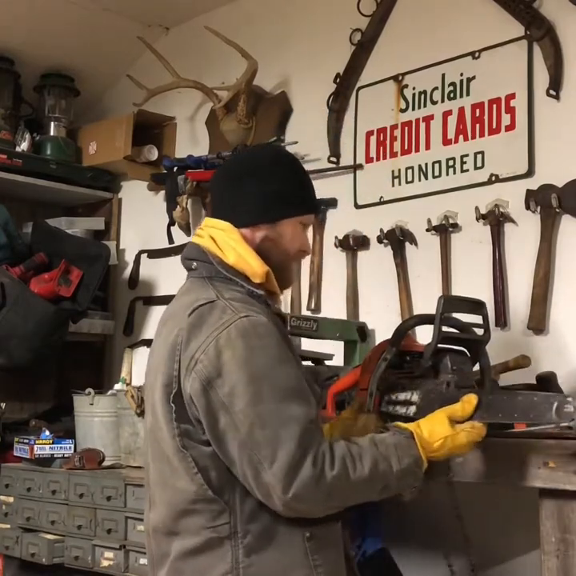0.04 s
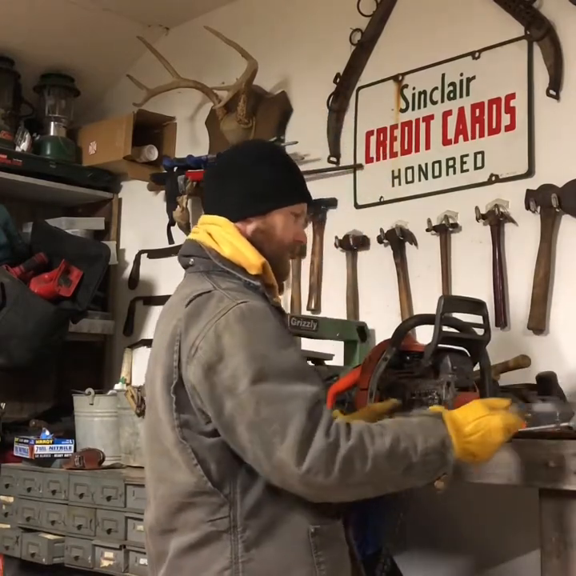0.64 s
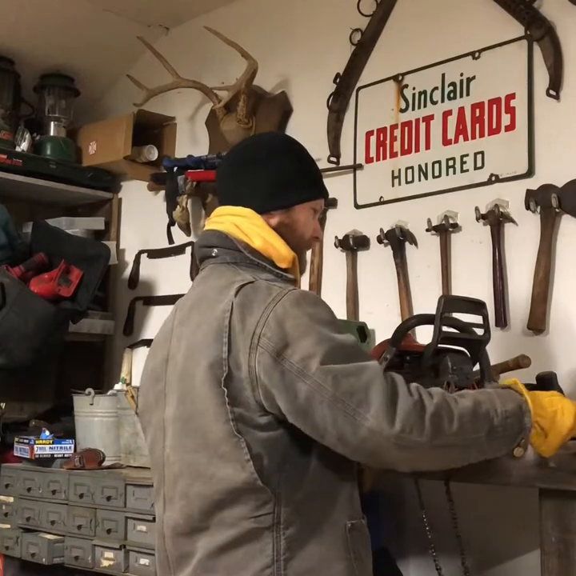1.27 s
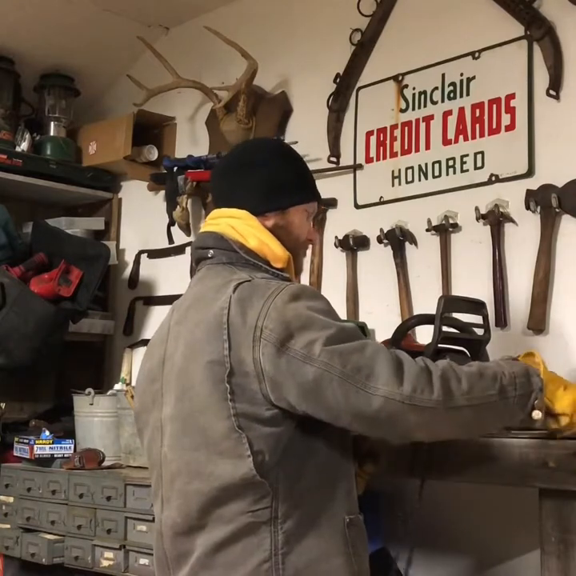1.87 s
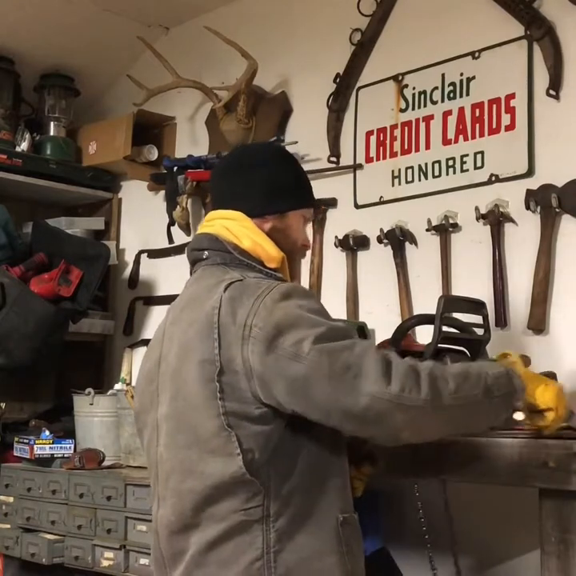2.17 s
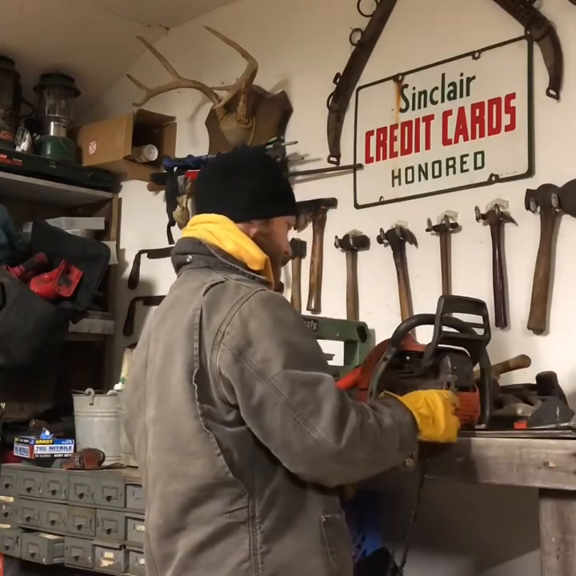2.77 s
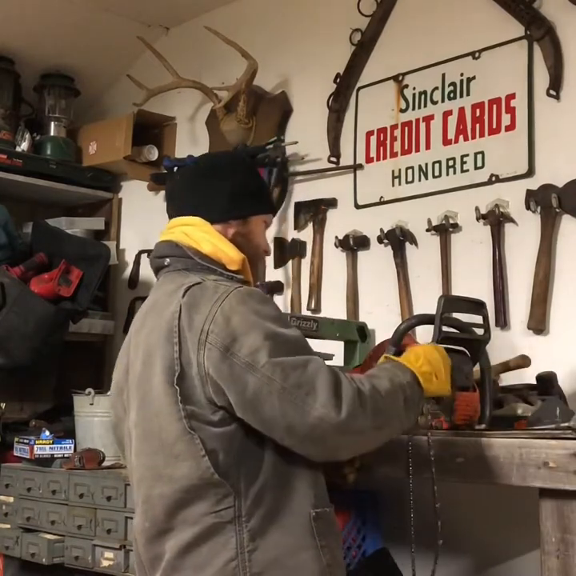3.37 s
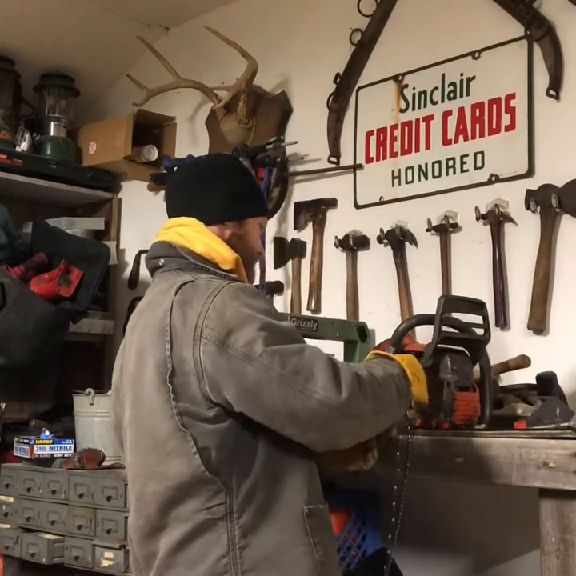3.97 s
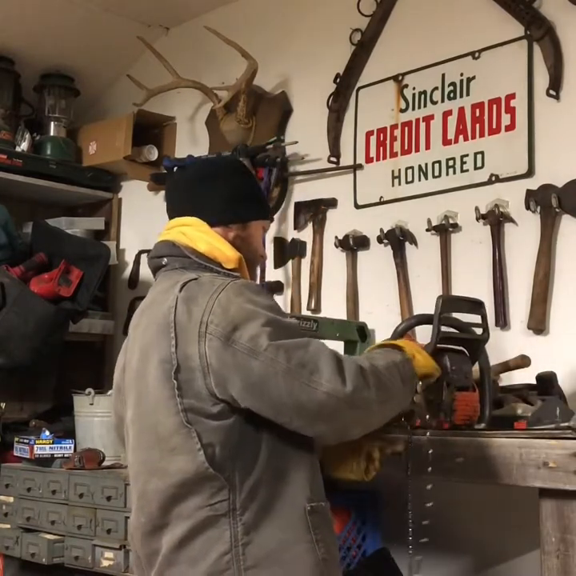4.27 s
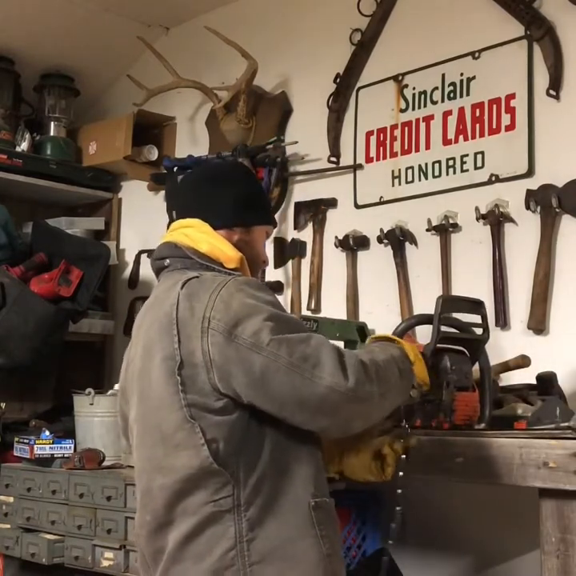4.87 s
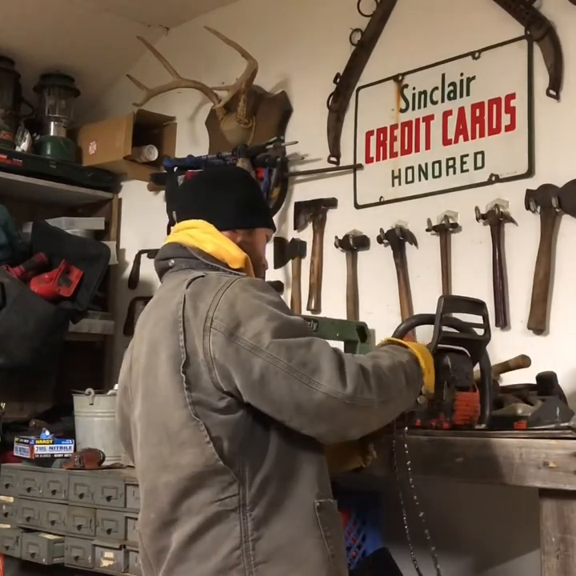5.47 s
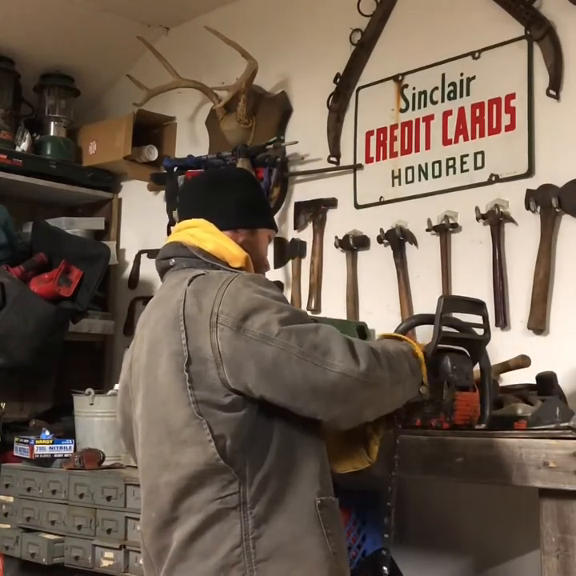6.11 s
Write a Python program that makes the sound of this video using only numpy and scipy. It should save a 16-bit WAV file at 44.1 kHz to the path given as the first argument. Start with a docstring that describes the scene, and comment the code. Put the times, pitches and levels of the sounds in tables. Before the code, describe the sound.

Woody bumps and a metal clatter on a bench, followed by light clinks and ticks of a saw chain being worked loose.

```python
"""A loose chainsaw chain is worked off its drive on a wooden bench in a small workshop.
First the steel guide bar slides off and is laid down with a few woody bumps and a clatter. Then the chain
drags and clacks over the plastic housing, its links tick and clink, and the steel clutch drum sings when
touched. Hits are a short crack plus ringing modes; drags are swarms of tiny slips. Underneath sit
a rubbing jacket sleeve, a short room tail and faint room tone."""
import sys
import numpy as np
from scipy import signal
from scipy.fft import rfft, irfft, next_fast_len
from scipy.io import wavfile

SR = 44100
rng = np.random.default_rng(int(sys.argv[2]) if len(sys.argv) > 2 else 0)


def digitize_waveform(pressure):
    """Quantize a signal to 16-bit integers and store it at the path in sys.argv[1].

    Rows of a 2-D input are taken as channels; values are limited to [-1, 1].
    """
    field = np.atleast_2d(pressure).T
    bounded = np.clip(field, -1, 1)
    quanta = np.round(bounded * 32767).astype(np.int16)
    wavfile.write(sys.argv[1], SR, quanta)


N = 270754

# Noise colours of the still room, the cloth and the sliding grit: pitch_hz, density_db
ROOM_TONE_EQ = [(15, -40.5), (25, 2), (145, 1), (242, -13), (317, -6), (516, -42), (677, -13.5),
                (1370, -44.5), (1740, -22.5), (16000, -33)]
CLOTH_EQ = [(40, -41), (100, -1), (190, 2), (450, -9), (900, -11.5), (2500, -23), (7000, -27.5),
            (16000, -43.5)]
GRIT_EQ = [(80, -15.5), (300, 9.5), (700, 4.5), (1400, -1.5), (2500, -4), (4000, -8), (7000, -10.5),
           (12000, -13.5), (16000, -22)]
# Length of the room tail: pitch_hz, t60_s
ROOM_DECAY = [(100, 0.45), (300, 0.48), (1500, 0.53), (5000, 0.44), (9000, .34), (16000, 0.24)]
# The crack of each body, its dense and quickly damped resonances: pitch_hz, density_db
BENCH_EQ = [(40, -26.5), (80, 2), (200, -5.5), (450, -2), (800, -6), (1400, -7), (2500, -12), (5000, -9.5),
            (16000, -19.5)]
BAR_EQ = [(100, 22.5), (500, 9), (1500, 2), (3300, -3.5), (4000, -2.5), (4850, -4.5), (6000, -7),
          (8500, -5.5), (12000, -9.5), (16000, -12)]
HOUSING_EQ = [(100, -49), (450, 0.5), (800, 0.5), (1400, -4.5), (2500, -1.5), (4000, -9), (7000, -10.5),
              (16000, -21)]
LINK_EQ = [(200, -26), (1500, -6.5), (2200, 10), (3800, -2.5), (5500, -4.5), (7200, 3), (8700, 2),
           (10300, -4), (12000, -1), (14000, -8), (16000, -7.5)]
# The ringing modes of each body: pitch_hz, level_db, t60_s
BENCH_RING = [(81.7, 9, 0.41), (159, 1, 0.16), (176.6, 6, 0.36), (197.7, 13.5, 0.13), (219.6, 0, 0.28),
              (276, 6.5, 0.092), (366.3, 5, 0.22), (397.7, 6, 0.18), (427.5, -2, 0.21), (496, 14.5, 0.045),
              (569.5, 6.5, 0.1), (648, 10, 0.043), (866, 5.5, 0.089), (1000, 7.5, 0.042),
              (1395, -1.5, 0.085)]
BAR_RING = [(675, 13, 0.057), (924, 1, 0.036), (1310, -13, 0.046), (1626, -3, 0.049), (2080, 5, 0.039),
            (2420, -26, 0.053), (2870, -5, 0.066), (4560, -15, 0.0092), (4840, 12, 0.011),
            (8800, -6, 0.044)]
HOUSING_RING = [(1406, 17.5, 0.028), (1382, 9, 0.06), (1618, 13, 0.018), (1810, 7, 0.016), (2330, 8, 0.033),
                (2520, 4, 0.023), (2920, -6, 0.02)]
DRUM_RING = [(1385, -3, 0.095), (2160, -10, 0.12), (5340, -0.5, 0.08), (5395, -4, 0.29),
             (8520, -6.5, 0.039), (8570, -3.5, 0.067), (11830, -10.5, .09), (15640, -7, .09)]
# Chain modes, scattered from link to link: pitch_hz, scatter_hz, level_db, t60_s
LINK_RING = [(2330, 230, -19, 0.031), (5520, 100, 5, 0.057), (7080, 340, -4, .04), (8695, 130, 10.5, 0.04),
             (8800, 240, -2.5, 0.027), (12040, 150, 7, 0.045), (15650, 90, -3, 0.07)]

# Cue levels are relative within each layer.
# Pulls on the chain and bar: peak_s, half_width_s, level_db, pitch_hz
DRAG_CUES = [(0.005, 0.048, -56.5, 550), (0.186, 0.034, -65.5, 1100), (0.459, 0.056, -64, 600),
             (0.663, 0.078, -58, 480), (0.816, 0.035, -63, 5000), (1.399, 0.048, -58.5, 2600),
             (1.485, 0.013, -48, 3150), (1.548, 0.012, -42, 1500), (1.765, 0.017, -49.5, 1830),
             (1.956, 0.013, -48, 1300), (2.987, 0.0087, -53, 2470), (3.056, 0.0064, -42.5, 1500),
             (3.241, 0.02, -54.5, 2820), (3.577, 0.011, -52, 2000), (3.696, 0.07, -57, 2400),
             (4.438, 0.14, -59.5, 9000), (4.524, 0.037, -47.5, 704), (4.646, 0.057, -43.5, 900),
             (4.667, 0.0072, -47.5, 4500), (4.934, 0.007, -53.5, 900), (5.046, 0.044, -41, 890),
             (5.446, 0.034, -51.5, 1395), (5.796, 0.055, -50.5, 2200), (5.855, 0.02, -46, 994)]
# Hits on wood, bar, plastic, and link on link: start_s, level_db, pitch_hz, sharpness_q, chatter_s
BENCH_CUES = [(0.156, -52, 294, 0.8, 0.011), (1.150, -40, 514, 0.88, 0.0031),
              (1.163, -40, 255, 0.48, 0.006), (1.268, -46.5, 450, 0.71, 0.0087),
              (1.280, -39, 194, 3.7, 0.0022), (1.579, -43.5, 203, 4.9, .008), (1.650, -41, 543, 1.4, .008),
              (1.661, -40, 240, 1.2, 0.005), (1.734, -41.5, 296, 1.2, 0.009), (1.768, -48, 256, 0.66, .005),
              (1.950, -45, 380, 1, 0.014), (1.990, -42, 232, 0.77, .003), (2.004, -30, 690, 0.97, 0.0032),
              (2.008, -25.5, 290, 6, 0.0035), (2.038, -33, 137, 1.4, 0.0055),
              (2.056, -26.5, 427, 1.7, 0.0024), (2.069, -34, 600, 0.91, 0.0017),
              (2.082, -37, 150, 0.74, 0.0012), (2.102, -39.5, 200, 0.46, 0.00092),
              (2.116, -35, 330, 1.7, .001), (2.141, -50, 420, .9, .002), (3.055, -53, 250, 0.74, 0.0058),
              (3.957, -56, 208, 3, 0.0044), (4.678, -45.5, 400, .6, 0.015), (4.712, -51, 220, 1.5, .006)]
BAR_CUES = [(1.540, -41, 1830, 0.55, 0.043), (1.978, -38, 1310, 0.5, .002),
            (1.980, -35.5, 3180, 0.61, 0.027), (2.004, -31, 5100, 1.23, 0.0031),
            (2.052, -30, 1220, 3.9, 0.006), (2.075, -42.5, 1080, 1.3, 0.0049),
            (2.111, -44.5, 1400, 1.5, 0.0045), (2.140, -49, 1200, 1.7, 0.02), (2.193, -50, 800, 1.3, .008),
            (2.232, -57, 1100, 2, 0.0075)]
HOUSING_CUES = [(3.052, -48.5, 1000, 0.53, 0.007), (3.090, -42, 3000, 0.37, 0.0029),
                (3.093, -51.5, 540, 4.7, 0.0029), (3.3505, -39.5, 1550, 3.9, .001),
                (3.361, -48.5, 1450, 1.8, .001), (3.578, -56, 1360, 3.3, 0.0044),
                (3.786, -60.5, 2540, 0.45, 0.0029), (4.164, -60.5, 2150, 3.7, 0.0065),
                (4.519, -54.5, 2400, 0.37, 0.0022), (5.734, -61, 2700, 2.3, .003),
                (5.765, -58.5, 2400, .6, 0.0045), (5.784, -48.5, 1650, 3.9, 0.012)]
CLINK_CUES = [(3.7209, -36, 6000, 0.41, 0.0011), (3.722, -48, 12300, 2.5, 0.0012),
              (4.947, -34, 7800, 0.7, 0.00018), (4.951, -42, 7000, 0.56, 0.00027),
              (4.962, -57, 7000, 0.35, 0.0042), (4.9903, -20, 11550, 0.96, 0.0006),
              (4.9947, -29, 8600, 0.71, 0.00033), (5.001, -33, 8780, 3.4, 0.00034),
              (5.404, -40, 8350, 0.21, 0.0018), (5.409, -39.5, 6200, 0.46, 0.00015)]
# The chain touches the clutch drum: start_s, level_db, pitch_hz, sharpness_q
DRUM_CUES = [(3.087, -40.5, 8460, 6), (3.224, -63, 7200, 2), (3.724, -44.5, 5960, 0.92),
             (4.163, -60.5, 7040, 1.2), (4.216, -61.5, 5400, 2.5), (4.600, -56, 7500, 1),
             (4.99, -30.5, 11800, 2.5), (5.409, -36.5, 7600, 2), (5.436, -44, 5500, 1.5),
             (5.848, -53.5, 10200, 4)]
# A link snaps straight and its neighbours settle: start_s, peak_db, length_s
TICK_CUES = [(3.086, -27, .004), (3.090, -45, .006), (4.512, -40, .004), (4.573, -21, .008),
             (5.667, -34.5, .02), (6.085, -35.5, .01)]

T = np.arange(N) / SR
HIT_T = T[:SR // 2]
HIT_GAIN = np.sqrt(SR / 100)   # the energy of 10 ms at rms 1


def from_db(db):
    """Decibels to gain."""
    return 10 ** (np.asarray(db) / 20)


def unit(x):
    """Scale to an energy of one."""
    return x / np.sqrt(np.sum(x ** 2) + 1e-20)


def at_hz(points, hz):
    """Read a curve on a log-frequency axis."""
    known_hz, values = np.transpose(points)
    return np.interp(np.log(np.maximum(hz, 1)), np.log(known_hz), values)


def noise(eq, size):
    """Coloured noise, rms 1."""
    padded = next_fast_len(size)
    gain = from_db(at_hz(eq, np.fft.rfftfreq(padded, 1 / SR)))
    coloured = irfft(rfft(rng.standard_normal(padded)) * gain, padded)
    return unit(coloured[:size]) * np.sqrt(size)


def focus(x, hz, q):
    """Focus the tone with one broad resonance."""
    centre = min(hz, SR / 3)
    return signal.lfilter(*signal.iirpeak(centre, max(q, 3 * centre / SR), fs=SR), x)


def add(track, start_s, sound):
    """Mix a sound in on its cue."""
    start = max(round(start_s * SR), 0)
    track[start:start + len(sound)] += sound[:max(N - start, 0)]


def swell(t, half_width_s):
    """A pull gathers and fades evenly around its peak."""
    return np.exp(-(t / half_width_s) ** 2 / 2)


def slips(per_s, spread_db, size):
    """Tiny contacts at random moments, of uneven strength."""
    clicks = (rng.random(size) < per_s / SR) * rng.choice([-1, 1], size)
    return clicks * from_db(spread_db * np.minimum(rng.exponential(1, size), 4))


def crackle(force, eq, t60):
    """Each contact feeds a body's dense resonances, which lose the energy fast."""
    kept_per_sample = from_db(-60 / (t60 * SR)) ** 2
    energy = signal.lfilter([1], [1, -kept_per_sample], force ** 2 + 1e-18)
    return noise(eq, len(force)) * np.sqrt(energy)


def mode_rings(modes, detune):
    """One dying sine per mode, nudged in pitch by the load of whatever touches the body."""
    mode_hz, mode_db, t60 = np.transpose(modes)[:, :, None]
    loaded_hz = mode_hz * (1 + detune * rng.standard_normal(mode_hz.shape))
    return np.sin(2 * np.pi * loaded_hz * HIT_T) * from_db(mode_db - 60 * HIT_T / t60)


def hits(cues, modes, crack_eq, crack_t60, chatter_db, ring_db, clean_db, in_step=False):
    """A click and tiny rebounds give a short crack, and a ring that swells while the rebounds last."""
    out = np.zeros(N)
    for start_s, level_db, pitch_hz, q, chatter_s in cues:
        contact = np.exp(-HIT_T / max(chatter_s, 1 / SR))
        force = from_db(chatter_db) * unit(rng.standard_normal(len(HIT_T)) ** 3 * contact)
        force[0] = 1
        crack = crackle(force, crack_eq, crack_t60)
        strengths = from_db(rng.standard_normal(len(modes)))
        strengths *= 1 if in_step else rng.choice([-1, 1], len(modes))
        ring = (strengths @ mode_rings(modes, detune=0.003)) * (1 - contact ** 2)
        # a clean hit rings more (clean_db per doubling of Q); a glancing one mostly cracks
        ring_gain = from_db(ring_db + clean_db * np.log2(q))
        sound = unit(focus(crack, pitch_hz, q)) + ring_gain * unit(focus(ring, pitch_hz, q))
        add(out, start_s, from_db(level_db) * unit(sound) * HIT_GAIN)
    return out


def room_tone(level_db):
    """The still room: a faint, steady bed of low noise."""
    return from_db(level_db) * noise(ROOM_TONE_EQ, N)


def workshop_reverb(send, build_s):
    """Cluttered walls scatter the sound into a short tail whose treble dies first."""
    t, tail = T[:SR * 3 // 4], 0
    white = rng.standard_normal((2, len(t)))
    edges_hz = np.geomspace(40, 18000, 15)
    for k, (low, high) in enumerate(zip(edges_hz, edges_hz[1:])):
        band = signal.sosfilt(signal.butter(2, [low, high], "band", fs=SR, output="sos"), white[k % 2])
        tail = tail + band * from_db(-60 * t / at_hz(ROOM_DECAY, np.sqrt(low * high)))
    fade_in = 1 - np.exp(-t / build_s)
    return signal.fftconvolve(send, unit(tail * fade_in))[:N]


def sleeve_rub(rest_db, pull_db, folds_per_s, fold_hz, uneven_db):
    """Heavy cloth rubs louder with each long pull; its folds flap in the lows under a smooth hiss."""
    full_pull_s, stretch = 0.064, 2.42   # short drags move the arm less; its swing outlasts the slide
    folds = np.interp(T * folds_per_s, np.arange(SR), rng.standard_normal(SR))
    effort = np.zeros(N)
    for peak_s, half_width_s, level_db, _ in DRAG_CUES:
        reach = from_db(level_db) * min(half_width_s / full_pull_s, 1)
        effort = np.hypot(effort, reach * swell(T - peak_s, stretch * half_width_s))
    level = np.hypot(from_db(rest_db), from_db(pull_db) * effort)
    rub = noise(CLOTH_EQ, N)
    rumble = signal.sosfiltfilt(signal.butter(2, fold_hz, fs=SR, output="sos"), rub)
    hiss = rub - rumble
    return level * (hiss + from_db(uneven_db * folds) * rumble)


def drags(slips_per_s, spread_db, q, slip_t60):
    """Sliding steel is a gritty swarm of slips that swells and fades with each pull."""
    out, t = np.zeros(N), T[:SR] - 0.5
    for peak_s, half_width_s, level_db, pitch_hz in DRAG_CUES:
        grit = crackle(slips(slips_per_s, spread_db, SR), GRIT_EQ, slip_t60)
        scrape = unit(focus(grit, pitch_hz, q)) * np.sqrt(SR)
        pull = from_db(level_db) * scrape * swell(t, half_width_s)
        add(out, peak_s - 0.5, pull[t + peak_s >= 0])
    return out


def bench_knocks():
    """The wooden bench answers each bump with a low, ringing thud."""
    return hits(BENCH_CUES, BENCH_RING, BENCH_EQ, crack_t60=0.04, chatter_db=-9.5, ring_db=4, clean_db=0.5)


def bar_clatter():
    """The steel guide bar rebounds as it is laid down: mostly chatter, a little ring."""
    return hits(BAR_CUES, BAR_RING, BAR_EQ, crack_t60=0.03, chatter_db=12, ring_db=-10, clean_db=2.5)


def housing_clacks():
    """The plastic housing damps each hit to a dry clack."""
    return hits(HOUSING_CUES, HOUSING_RING, HOUSING_EQ,
                crack_t60=0.024, chatter_db=11, ring_db=-10.5, clean_db=5)


def drum_tings(touches_per_s, touches_db, swing_t60):
    """The swinging chain hits the clutch drum and keeps brushing it: thin tones flutter as they die."""
    out = np.zeros(N)
    for start_s, level_db, pitch_hz, q in DRUM_CUES:
        touches = slips(touches_per_s, spread_db=5.5, size=len(HIT_T)) * from_db(-60 * HIT_T / swing_t60)
        force = from_db(touches_db) * unit(touches)
        force[0] = 1
        tone = signal.fftconvolve(force, mode_rings(DRUM_RING, detune=0.0012).sum(axis=0))
        add(out, start_s, from_db(level_db) * unit(focus(tone, pitch_hz, q)) * HIT_GAIN)
    return out


def link_runs(gap_s, jitter, settle_db):
    """One link snaps straight and its neighbours follow softly, a little unevenly: start_s, peak_db."""
    ticks = []
    for start_s, peak_db, length_s in TICK_CUES:
        lags = gap_s * np.cumsum(1 + jitter * rng.standard_normal(10))
        ticks += [(start_s, peak_db)] + [(start_s + lag, settle_db) for lag in lags[lags < length_s]]
    return ticks


def link_ticks(pitch_hz, q, t60, rattle_db):
    """A link hits its rivet: one sharp spike and a brief rattle."""
    out = np.zeros(N)
    for start_s, peak_db in link_runs(gap_s=0.0044, jitter=0.19, settle_db=-41):
        rattle = rng.standard_normal(len(HIT_T)) * from_db(-60 * HIT_T / t60)
        force = from_db(rattle_db) * unit(rattle)
        force[0] += 1
        tick = focus(focus(force, pitch_hz, q), pitch_hz, q)
        add(out, start_s, from_db(peak_db) * tick / np.abs(tick).max())
    return out


def chain_clinks(links):
    """Near-equal links clash, ring in step, then drift apart: a hard chink and an ever-new shimmer."""
    out = np.zeros(N)
    for cue in CLINK_CUES:
        clusters = [(hz + scatter_hz * rng.standard_normal(), db, t60)
                    for hz, scatter_hz, db, t60 in LINK_RING for _ in range(links)]
        out += hits([cue], clusters, LINK_EQ,
                    crack_t60=0.061, chatter_db=-12.5, ring_db=9, clean_db=6, in_step=True)
    return out


def scene():
    """Hits and drags, each with its own reverb send, over a bed of cloth and room tone."""
    bench = from_db(1) * bench_knocks()
    bar = from_db(-1.5) * bar_clatter()
    housing = from_db(3.5) * housing_clacks()
    chain = from_db(-1) * chain_clinks(links=7)
    drum = drum_tings(touches_per_s=800, touches_db=-1.5, swing_t60=0.37)
    ticks = link_ticks(pitch_hz=9600, q=1.2, t60=0.0086, rattle_db=4)
    sliding = from_db(-3.5) * drags(slips_per_s=1400, spread_db=3.5, q=0.5, slip_t60=0.043)
    direct = bench + bar + housing + chain + drum + ticks + sliding
    send = (from_db(-2) * bench + from_db(-4) * bar + from_db(-2) * housing + from_db(-5) * chain
            + from_db(-13) * drum + from_db(-9.5) * ticks + from_db(-7) * sliding)
    sleeve = sleeve_rub(rest_db=-63, pull_db=-8.5, folds_per_s=30, fold_hz=450, uneven_db=1)
    bed = sleeve + room_tone(level_db=-61.5)
    return (direct + workshop_reverb(send, build_s=0.00041) + bed)[None]


def record(dry):
    """The microphone loses the deepest bass; the top is cut steeply."""
    low_cut = signal.butter(6, 43, "high", fs=SR, output="sos")
    high_cut = signal.ellip(10, 0.1, 80, 16000, fs=SR, output="sos")
    return signal.sosfilt(high_cut, signal.sosfilt(low_cut, dry))


dry = scene()
out = record(dry)
digitize_waveform(out)
```